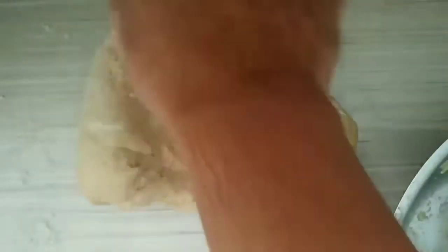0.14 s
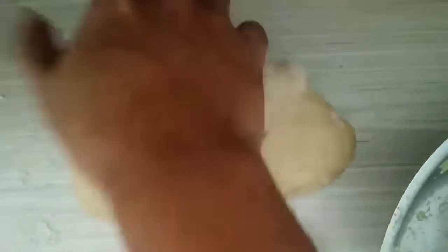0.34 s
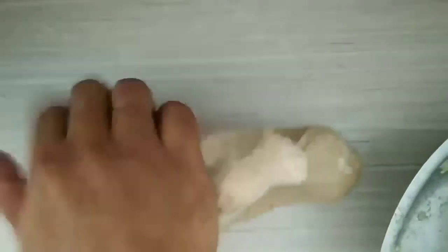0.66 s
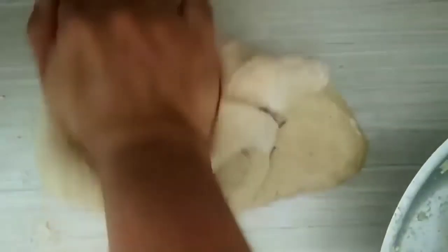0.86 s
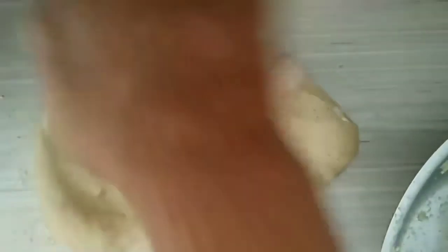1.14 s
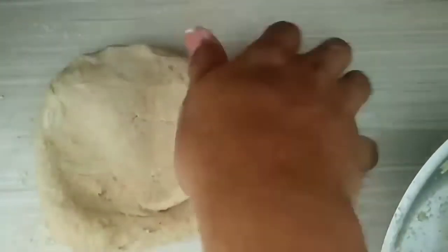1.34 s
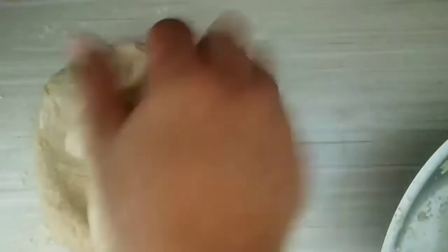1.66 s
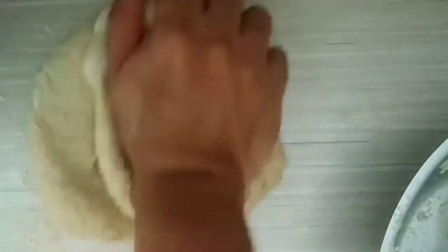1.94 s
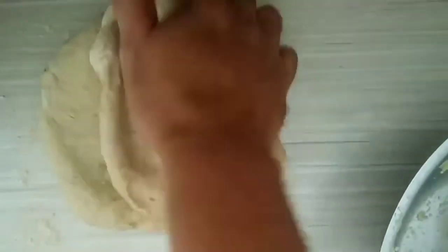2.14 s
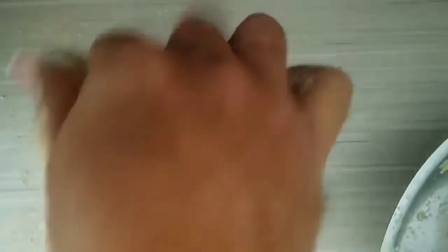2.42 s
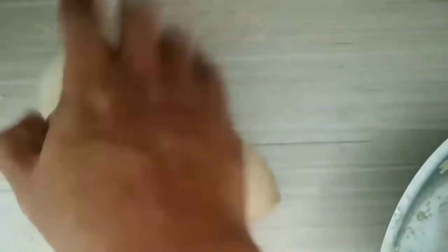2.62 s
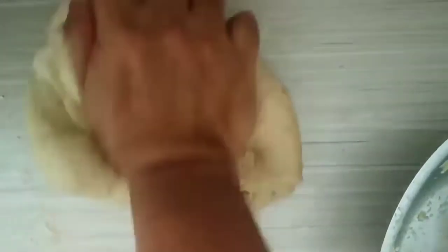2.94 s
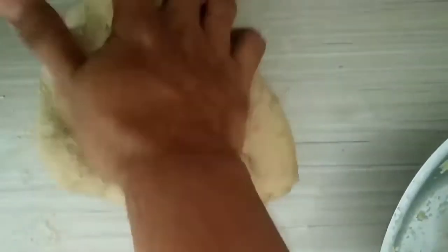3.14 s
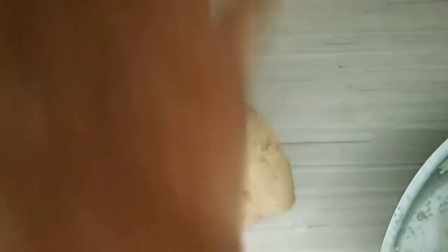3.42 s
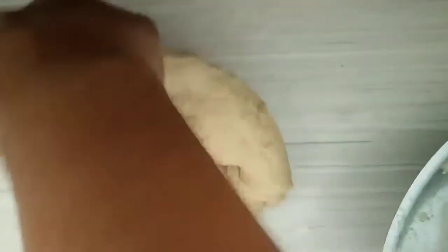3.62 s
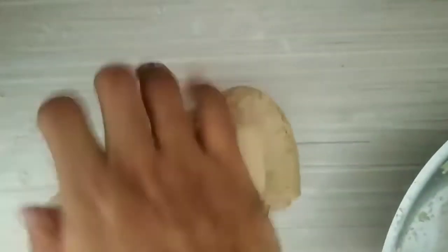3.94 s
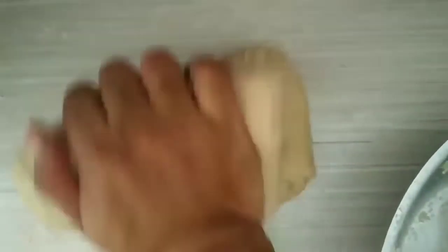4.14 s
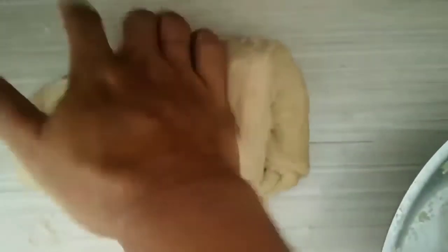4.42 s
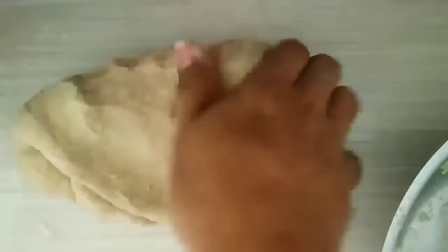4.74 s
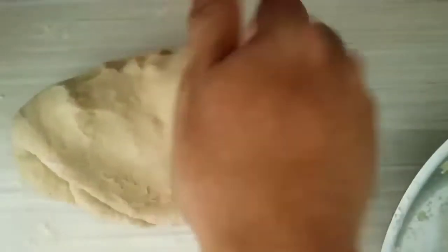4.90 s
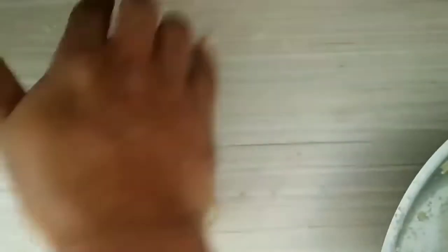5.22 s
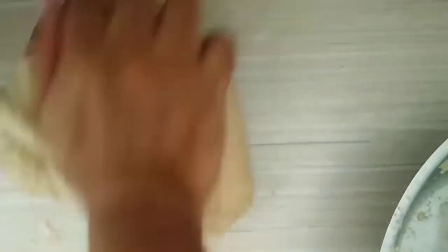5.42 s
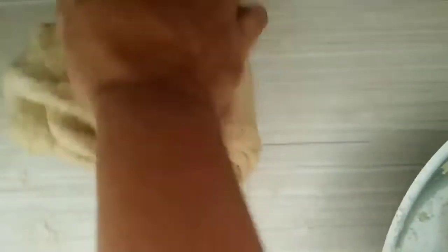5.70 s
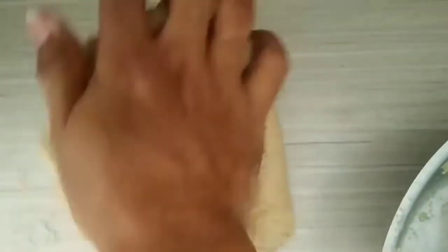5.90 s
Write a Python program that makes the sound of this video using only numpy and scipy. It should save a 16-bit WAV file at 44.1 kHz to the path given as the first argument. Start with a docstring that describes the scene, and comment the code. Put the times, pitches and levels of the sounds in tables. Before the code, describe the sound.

A hand kneads soft dough on a floured board, with low thuds, dry floury swishes, sticky squelches and soft pats over room hiss.

```python
"""A hand kneads soft dough on a floured board, close to the microphone, over steady room hiss and hum.
0-0.7 s: air sputters, the dough flops down (ringing board modes, hollow pops), a pat, fingers sweep flour.
0.8-3 s: pushes with crisp swishes (shaped noise), squelches and judders (stick-slip), a flop at 1.2 s.
3-4.6 s: four more flops, settling in softer bumps, with pops, pats and pushes among them.
4.7-6 s: a strong sweep (patchy noise), a last bright push at 5.5 s, pats and a final sweep."""
import sys
import numpy as np
from scipy import signal
from scipy.fft import rfft, irfft, next_fast_len
from scipy.io import wavfile

SR = 44100
rng = np.random.default_rng(int(sys.argv[2]) if len(sys.argv) > 2 else 0)


def dump(signal):
    """Clip the signal to [-1, 1] and save it as 16-bit WAV at the path in sys.argv[1]."""
    limited = np.clip(np.atleast_2d(signal).T, -1, 1)
    pcm = np.round(limited * 32767).astype(np.int16)
    wavfile.write(sys.argv[1], SR, pcm)


N = 267246
TIME_S = np.arange(N) / SR

# Levels are those of the dry source, ahead of its filters, echo, bowl and capsules.

# board modes damped by dough; each blow sets the first row's f: f/Hz, level/dB, t60/s
BOARD_MODES = [(177.8, 24, 0.062), (316.4, 1.5, 0.054), (632, -21, 0.2), (760, 5, 0.012),
               (910, -11.5, 0.094)]
# dough flopped down: t/s, peak level/dB, contact/ms, lowest-mode gain/dB (weak = off centre),
# lowest-mode f under load/Hz, settling time/s, settling bump below blow/dB
FLOPS = [(0.0786, -5.5, 0.74, -19.5, 183, .027, 13.5), (1.1599, -11.5, 1.05, 4, 175, 0.036, 19),
         (3.075, -21, 1.06, -6, 176, .026, 1), (3.4386, -12.5, 1.03, 0, 160, 0.029, 12),
         (4.193, -17.5, 2.2, 2, 179, 0.036, 14), (4.5743, -16, 3.1, 9, 168, 0.067, 6)]
# hand pats dough: t/s, peak level/dB, contact/ms, lowest-mode gain/dB, lowest-mode f under load/Hz
PATS = [(0.153, -24.5, 1.5, 4, 178), (0.5251, -31.5, 2.2, 5, 180), (0.956, -35, 1.1, 27, 189),
        (1.0008, -20.5, 1.2, 2, 194), (2.133, -31, 0.84, 2, 169), (2.78, -31, 5.1, -8, 157),
        (2.9226, -28.5, 0.64, -8, 177), (3.027, -31, 3.4, 0, 193), (3.414, -9, 1.7, 9, 178.3),
        (3.518, -28, 3.6, 4, 168), (3.9206, -31.5, 5.3, 9, 165), (4.0788, -29, 0.9, -6, 190),
        (4.609, -34, 2.5, 6, 165), (4.762, -35, 2.1, -6, 185), (5.314, -27, 1.5, -20, 184),
        (5.331, -31, 1.5, -15, 180), (5.3835, -29.5, 2, 2, 200), (5.586, -26, 1.4, 3, 182),
        (5.7475, -20, 1.1, -6.5, 172)]
# second settling bump: longer gap, weaker the later it comes
SETTLE_GAP_RATIO, SETTLE_FADE_DB_PER_S = 1.45, 153
SETTLE_CONTACT_MS, SETTLE_LOWEST_DB = 2.96, 17

# dough judders over the board: start t/s, length/s, rms level at crest/dB, slip rate/Hz
JUDDERS = [(.828, 0.053, -31, 200), (1.9, 0.15, -35, 190), (2.955, 0.13, -43, 180),
           (4.22, 0.042, -34.5, 183), (5.485, 0.13, -41.5, 185)]
JUDDER_JITTER_RATIO, JUDDER_ROUGH_DB, JUDDER_CHANGES_PER_S = 0.073, 2.5, 31

# palm flicks over floury dough: t/s, rms level at crest/dB, rise/ms, left-right/dB, gap resonance f/Hz
SWISHES = [(0.069, -38, 11.6, 1, 6940), (0.083, -39.5, 16, 0, 8000), (0.1547, -34.5, 4.3, 1, 7360),
           (0.8128, -27, 4.4, 1, 5900), (0.813, -44, 2.7, 0, 1500), (1.157, -44.5, 2.8, 4, 1600),
           (1.9456, -25.5, 2.3, 3, 5150), (2.9307, -25.5, 3.4, 1, 5200), (3.4118, -34, 5, -4.5, 1400),
           (3.419, -32.5, 5, -3, 2300), (3.4373, -46, 2.6, -3, 1300), (3.4717, -37, 5.2, -3.5, 2480),
           (4.198, -30.5, 3.3, 2, 6200), (4.633, -34.5, 5, -3, 4170), (5.4721, -26, 3.3, 2.5, 8050),
           (5.475, -41, 4.3, 3, 2200), (5.869, -33.5, 2.7, -4, 8000)]
# swish hiss spectrum: f/Hz, relative level/dB per Hz
SWISH_SPECTRUM = [(300, -4), (1000, 5.5), (3500, 3), (6500, 9.5), (9000, 14), (12500, 9), (15000, 4)]
GAP_DB, GAP_WIDTH_HZ = -7, 870

# air squeezed from under hand or dough: t/s, peak level/dB, f/Hz, t60/s
POPS = [(0.08, -14.5, 337, 0.036), (.0825, -27, 695, 0.047), (.170, -28.5, 600, 0.025),
        (.836, -35, 694, 0.047), (.887, -39, 1310, 0.011), (.9985, -37, 730, 0.035),
        (1.1615, -14.5, 349, 0.026), (1.1625, -23, 703, .012), (1.171, -28.5, 620, 0.012),
        (2.013, -26.5, 800, 0.0099), (2.018, -30, 2340, 0.0073), (2.037, -30, 710, .014),
        (2.991, -24.5, 2300, 0.012), (2.992, -34, 1290, 0.0073), (3.017, -34, 775, .018),
        (3.0738, -25.5, 840, 0.012), (3.426, -28.5, 750, 0.028), (3.4315, -13.5, 266, 0.035),
        (3.4395, -25.5, 666, 0.0056), (3.915, -36.5, 1020, 0.012), (4.221, -29, 760, 0.0078),
        (4.242, -46, 1680, 0.006), (4.575, -16, 330, 0.022), (4.698, -37, 807, 0.013),
        (4.743, -38, 830, 0.012), (4.782, -30.5, 1830, 0.0082), (5.331, -27.5, 910, 0.011),
        (5.58, -37, 800, 0.016), (5.746, -27, 805, 0.0034)]
# run of growing pops ahead of the first flop
SPUTTER_START_S, SPUTTER_GAP_S, SPUTTER_DB = .0395, .0083, -26
SPUTTER_GROWTH_DB, SPUTTER_HZ, SPUTTER_T60_S = 1.7, 577, 0.0076
# pops come from the right, late on the left
POP_LAG_MS, POP_PAN_DB = 0.27, -0.5

# heel of hand pushes: full-grip t/s, grip time/s, length/s, brushing level/dB,
# dragging level/dB (before DRAG_LIFT_DB), crackle level/dB
PUSHES = [(0.049, 0.014, 0.033, -53.5, -39.5, -52), (0.149, .018, 0.041, -46, -44, -51),
          (0.827, 0.043, 0.063, -40.5, -41.5, -50), (1.26, 0.16, 0.16, -49.5, -47.5, -58),
          (1.946, 0.05, 0.065, -46, -43.5, -53), (2.011, 0.026, 0.024, -37, -43, -40),
          (2.068, 0.022, 0.35, -46, -50.5, -64), (2.988, 0.083, 0.06, -44.5, -43, -46.5),
          (3.137, 0.03, 0.02, -48.5, -49, -67), (3.416, 0.0061, 0.058, -72, -40.5, -48),
          (4.205, 0.032, 0.081, -40, -42.5, -48), (4.629, 0.016, 0.009, -44.5, -45.5, -47.5),
          (5.482, 0.015, 0.047, -44, -43, -62), (5.575, 0.023, 0.0086, -45.5, -43, -49)]
# a push slows as the dough resists, then lets go
SAG_DB_PER_S, LET_GO_S = 27, 0.033
# fingers gather dough: greatest-speed t/s, swell time/s, brushing level/dB,
# dragging level/dB (before DRAG_LIFT_DB)
SWEEPS = [(.01, .05, -47.5, -49), (.275, 0.072, -53.5, -51.5), (.66, 0.13, -49, -50.5),
          (.735, 0.13, -48, -50), (.985, 0.036, -60, -52.5), (1.515, 0.059, -58, -54),
          (1.817, 0.24, -47, -52.5), (2.809, 0.11, -46, -49.5), (4.09, 0.43, -61, -56),
          (4.778, 0.084, -41.5, -44.5), (5.322, 0.052, -45, -45), (5.82, 0.11, -50, -63),
          (6.04, 0.14, -51, -54.5)]
SWEEP_STOP_S = 0.06
# the hand never quite leaves the dough
TOUCH_BRUSH_DB, TOUCH_DRAG_DB, TOUCH_WANDER_DB = -57, -64, 3.5
# floured dough hardly sticks: crackle of sweep and touch relative to unlifted dragging
SWEEP_TACK_DB = -7.5
DRAG_LIFT_DB = 6.0
# brushing spectrum: f/Hz, relative level/dB per Hz
BRUSH_SPECTRUM = [(1000, -60), (2500, 2), (4200, 0.5), (7000, 2), (9000, 3.5), (12000, -0.5), (15000, 1.5),
                  (16000, -56)]
# dragging spectrum: f/Hz, relative level/dB per Hz
DRAG_SPECTRUM = [(60, -50), (100, -45), (140, 22.5), (190, 26), (300, 19.5), (460, 8.5), (600, 7),
                 (790, 13.5), (1100, 0.5), (1900, 3), (3000, -4), (5000, -6), (10000, -44)]
SNAPS_PER_S, SNAP_SPREAD_DB, SNAP_CYCLES = 2200, 3.0, 16

# fold opens or closes: t/s, length/s, rms level/dB (then swelled to a crest), start f/Hz, end f/Hz
SQUELCHES = [(0.034, .05, -49, 2030, 1790), (0.851, 0.068, -41.5, 705, 850), (1.31, 0.13, -54.5, 980, 1050),
             (1.909, 0.044, -48, 2050, 1340), (2.966, 0.079, -45, 3130, 1100),
             (3.118, 0.037, -55, 1990, 2040), (4.235, 0.058, -61, 2280, 1220),
             (4.723, 0.045, -50.5, 2000, 1690), (5.485, 0.075, -50.5, 2300, 1350),
             (5.558, 0.034, -47, 1200, 1800)]
SLIPS_PER_S, SLIP_SPREAD_RATIO, FOLD_WIDTH_HZ = 700, 0.64, 270

# bowl resonances: f/Hz, level relative to driving sound/dB, width/Hz
BOWL_MODES = [(529, -5.5, 14), (625.5, -2, 6.1), (1273, -5.5, 24), (1860, -2.5, 15), (2423, -6.5, 13),
              (2670, -26, 12), (3980, -5, 23), (6570, -5.5, 60), (7500, -9, 52)]
# room hiss and hum spectrum: f/Hz, relative level/dB per Hz
AMBIENCE_SPECTRUM = [(30, -49), (80, -41), (130, -10.5), (185, 4), (290, -6.5), (520, -11), (1000, -23),
                     (2000, -21.5), (3200, -26.5), (4300, -28.5), (8700, -29.5), (12500, -31),
                     (15500, -34.5)]
AMBIENCE_DB = -48
# faint appliance whine: f/Hz, rms level/dB
WHINE = [(2050, -69.5), (2440, -73.5), (3221, -73.5), (4978, -77), (8769, -79), (13566, -80)]
# left-right likeness of noise: f/Hz, correlation/1
LIKENESS = [(60, 0.11), (140, 1), (290, 0.63), (640, 0.62), (1400, 0), (3000, 0), (15000, 0)]
# room echo spectrum: f/Hz, relative level/dB per Hz
ECHO_SPECTRUM = [(90, -27), (135, -1), (180, -6.5), (300, -3), (450, 4.5), (630, 4), (850, -1),
                 (1300, 11.5), (4000, -5), (15000, -10.5)]
KITCHEN_T60_S = 0.56
# capsule colour: f/Hz, left-right/dB
BALANCE = [(150, -0.3), (330, 0.5), (750, -1), (1200, 1), (2700, 0.5), (4200, 1), (6400, -4), (9800, -1),
           (14000, 4)]
CUTOFF_HZ = 16000


def thuds():
    """Weight of dough and hand rings the board briefly; each flop settles in two further bumps."""
    blows = list(PATS)
    for s, db, contact_ms, lowest_db, hz, settle_s, softer_db in FLOPS:
        gap_s = settle_s * SETTLE_GAP_RATIO
        bump_s, bump_db = s + settle_s, db - softer_db
        last_db = bump_db - SETTLE_FADE_DB_PER_S * gap_s
        blows.append((s, db, contact_ms, lowest_db, hz))
        blows.append((bump_s, bump_db, SETTLE_CONTACT_MS, SETTLE_LOWEST_DB, hz))
        blows.append((bump_s + gap_s, last_db, SETTLE_CONTACT_MS, SETTLE_LOWEST_DB, hz))
    out = np.zeros((2, N))
    for s, db, contact_ms, lowest_db, hz in blows:
        add(out, s, from_db(db) * strike(contact_ms, lowest_db, hz, low_cut_hz=86.8, low_cut_db=42))
    return out


def strike(contact_ms, lowest_db, lowest_hz, low_cut_hz, low_cut_db, size=8192):
    """Push on the board, peak 1: longer contact weakens higher modes, load retunes the lowest."""
    contact = TIME_S[:size] / (contact_ms / 1000)
    push = (contact * np.exp(-contact * 2)) ** 2
    out = np.zeros(size)
    for k, (hz, db, t60_s) in enumerate(BOARD_MODES):
        if k == 0:
            hz, db = lowest_hz, db + lowest_db
        # neighbouring modes swing against each other, so the thud builds up roundly
        gain = (-1) ** k * from_db(db)
        r, w = from_db(-60 / (t60_s * SR)), 2 * np.pi * hz / SR
        out += gain * signal.lfilter([0, np.sin(w)], [1, -2 * r * np.cos(w), r * r], push)
    # a small surface radiates hardly any deep bass
    low_cut = signal.cheby2(4, low_cut_db, low_cut_hz, "high", fs=SR, output="sos")
    out = signal.sosfilt(low_cut, out)
    return out / np.abs(out).max()


def judders():
    """Dragged dough sticks and slips near the lowest mode's pitch: a short unsteady purr."""
    out = np.zeros((2, N))
    for s, length_s, db, hz in JUDDERS:
        progress = np.linspace(0, 1, int(length_s * SR))
        pace, grip = flutter(JUDDER_CHANGES_PER_S)[:2 * len(progress)].reshape(2, -1)
        slip_hz = hz * (1 + JUDDER_JITTER_RATIO * pace)
        swing = np.sqrt(2) * np.sin(2 * np.pi * np.cumsum(slip_hz) / SR)
        level = from_db(db + JUDDER_ROUGH_DB * grip) * np.sin(np.pi * progress)
        add(out, s, level * swing)
    return high_pass(out, 110)


def swishes(size=4096):
    """Flour friction swells and dies within milliseconds, coloured by the gap under the palm."""
    out = np.zeros((2, N))
    for s, db, rise_ms, pan_db, hz in SWISHES:
        age = TIME_S[:size] * 1000 / rise_ms
        swell = age * np.exp((1 - age ** 2) / 2)  # crest 1 at age 1
        gap = cavity(rng.standard_normal((2, size)), hz, GAP_WIDTH_HZ)
        hiss = rms_one(stereo_noise(SWISH_SPECTRUM, size=size) + from_db(GAP_DB) * gap)
        add(out, s, from_db(db) * pan(pan_db) * swell * hiss)
    return out


def pops(size=4096, count=5):
    """Air pockets open within about a cycle and ring a few more; smaller pockets are higher."""
    out, t = np.zeros((2, N)), TIME_S[:size]
    sputter = [(SPUTTER_START_S + k * SPUTTER_GAP_S, SPUTTER_DB + k * SPUTTER_GROWTH_DB,
                SPUTTER_HZ, SPUTTER_T60_S) for k in range(count)]
    for s, db, hz, t60_s in POPS + sputter:
        opening = 1 - np.exp(-2 * hz * t)
        pop = np.sin(2 * np.pi * hz * t) * opening * from_db(-60 * t / t60_s)
        add(out, s, from_db(db) * pop / np.abs(pop).max())
    # so small a source radiates no deep bass
    return high_pass(out, 170)


def rubbing():
    """Skin brushes flour with a fine hiss; pressed dough drags unevenly, crackles and squelches."""
    brushing, dragging, sticking = friction()
    brush_level = brushing * from_db(1.3 * flutter(45)) * from_db([[-1.0], [.8]])
    drag_level = dragging * from_db(DRAG_LIFT_DB + 1.15 * flutter(49))
    tack_level = sticking * from_db(2.9 * flutter(45))
    brush = brush_level * patchy_noise(BRUSH_SPECTRUM, patchy_db=2.0, per_s=14.6)
    drag = drag_level * patchy_noise(DRAG_SPECTRUM, patchy_db=3.5, per_s=26.0)
    tack = tack_level * crackle(SNAPS_PER_S, SNAP_SPREAD_DB, SNAP_CYCLES)
    return brush + drag + tack + squelches()


def friction():
    """Brushing, dragging and sticking levels: pushes, sweeps and resting touch add in power."""
    touch_db = [[TOUCH_BRUSH_DB], [TOUCH_DRAG_DB], [TOUCH_DRAG_DB + SWEEP_TACK_DB]]
    power = from_db(touch_db + TOUCH_WANDER_DB * flutter(2)) ** 2
    for s, grip_s, length_s, brush_db, drag_db, tack_db in PUSHES:
        age_s = TIME_S - s
        grip = np.exp(-np.clip(-age_s / grip_s, 0, 10) ** 2 * 2)
        sag = from_db(-SAG_DB_PER_S * np.clip(age_s, 0, length_s))
        let_go = np.exp(-np.clip(age_s - length_s, 0, 1) / LET_GO_S)
        power += (from_db([[brush_db], [drag_db], [tack_db]]) * grip * sag * let_go) ** 2
    for s, swell_s, brush_db, drag_db in SWEEPS:
        age_s = np.clip(TIME_S - s, -1, 1)
        sweep = 1 / np.cosh(2 * age_s / np.where(age_s < 0, swell_s, SWEEP_STOP_S))
        power += (from_db([[brush_db], [drag_db], [drag_db + SWEEP_TACK_DB]]) * sweep) ** 2
    return np.sqrt(power)


def patchy_noise(spectrum, patchy_db, per_s, count=9):
    """Noise whose bands swell and fade separately as the contact shifts; rms 1."""
    edges_hz = np.concatenate([[1], np.geomspace(600, 12000, count - 1), [SR]])
    size = next_fast_len(N)
    whole = rfft(stereo_noise(spectrum), size)
    hz = np.fft.rfftfreq(size, 1 / SR)
    out = np.zeros((2, N))
    for low_hz, high_hz in zip(edges_hz, edges_hz[1:]):
        band = irfft(whole * ((hz >= low_hz) & (hz < high_hz)), size)[:, :N]
        out += band * from_db(patchy_db * flutter(per_s))
    return rms_one(out)


def crackle(per_s, size_db, cycles, count=18):
    """Tacky dough lets go in tiny snaps that ring at one of several pitches; rms 1."""
    out = np.zeros((2, N))
    for hz in np.geomspace(720, 3500, count):
        snaps = np.zeros((2, N))
        at = rng.integers(0, N, int(per_s * N / SR / count))
        spread_db = size_db * np.minimum(rng.exponential(1, len(at)), 3)
        snaps[:, at] = rng.standard_normal((2, len(at))) * from_db(spread_db)
        # 60 dB down after the given cycles
        r, w = from_db(-60 * hz / (cycles * SR)), 2 * np.pi * hz / SR
        ring = signal.lfilter([1 - r, 0, r - 1], [1, -2 * r * np.cos(w), r * r], snaps + 1e-18)
        out += ring / np.sqrt(hz)
    return rms_one(out)


def squelches():
    """Skin peels off dough in quick uneven slips that ring in a fold of changing size."""
    out = np.zeros((2, N))
    for s, length_s, db, start_hz, end_hz in SQUELCHES:
        progress = np.linspace(0, 1, int(length_s * SR))
        slipping = rng.random(len(progress)) < SLIPS_PER_S / SR
        strength = 1 + SLIP_SPREAD_RATIO * rng.standard_normal((2, len(progress)))
        fold_hz = start_hz * (end_hz / start_hz) ** progress
        fold = cavity(slipping * strength, fold_hz, FOLD_WIDTH_HZ)
        add(out, s, from_db(db) * np.sin(np.pi * progress) * fold)
    return high_pass(out, 500)


def bowl(x):
    """Narrow resonances of the bowl beside the board, driven by the sound around it."""
    out = np.zeros_like(x)
    for hz, db, width_hz in BOWL_MODES:
        b, a = signal.iirpeak(hz, hz / width_hz, fs=SR)
        out += from_db(db) * signal.lfilter(b, a, x)
    return out


def kitchen(x, wet_db, first_s, size=24000):
    """Wall echoes build up after a short gap and die away."""
    t = TIME_S[:size]
    build_up = np.clip(t / first_s - 1, 0, 1)
    tail = stereo_noise(ECHO_SPECTRUM, size=size) * from_db(-60 * t / KITCHEN_T60_S) * build_up
    tail = tail / np.sqrt(np.sum(tail ** 2) / 2)
    return x + from_db(wet_db) * signal.fftconvolve(x, tail, axes=1)[:, :N]


def ambience():
    """Steady noise for the room's hum and hiss, steady sines for the thin whine."""
    out = from_db(AMBIENCE_DB) * stereo_noise(AMBIENCE_SPECTRUM)
    for hz, db in WHINE:
        out += from_db(db) * np.sqrt(2) * np.sin(2 * np.pi * (hz * TIME_S + rng.random()))
    return out


def cavity(x, hz, width_hz):
    """One resonance, pitch free to move per sample; rms 1."""
    turn = np.exp(2j * np.pi * np.cumsum(hz * np.ones(x.shape[-1])) / SR)
    # shift the pitch to 0 Hz, smooth, shift back
    smooth = signal.lfilter([1], [1, -np.exp(-np.pi * width_hz / SR)], x / turn)
    return rms_one((smooth * turn).real)


def stereo_noise(spectrum, size=N):
    """Coloured noise, left-right correlation by frequency from LIKENESS; rms 1."""
    fft_size = next_fast_len(size)
    hz = np.maximum(np.fft.rfftfreq(fft_size, 1 / SR), 1)
    mid, side = rfft(rng.standard_normal((2, fft_size)))
    alike = np.clip(at_hz(LIKENESS, hz), -1, 1)
    both = np.sqrt(1 + alike) * mid + np.sqrt(1 - alike) * side * [[1], [-1]]
    return rms_one(irfft(both * from_db(at_hz(spectrum, hz)), fft_size)[:, :size])


def flutter(per_s):
    """Smooth random wobble, rms 1."""
    r = np.exp(-2 * np.pi * per_s / SR)
    wobble = signal.lfilter([1], [1, -2 * r, r * r], rng.standard_normal(N + SR))
    return rms_one(wobble[SR:])  # drop the filter's run-in


def high_pass(x, hz):
    """Second-order low cut."""
    return signal.sosfilt(signal.butter(2, hz, "high", fs=SR, output="sos"), x)


def pan(left_right_db):
    """Left and right gains for a level difference."""
    return from_db(np.array([[left_right_db], [-left_right_db]]) / 2)


def off_centre(x, lag_ms, pan_db):
    """Delay the left side and tip the balance."""
    left = np.interp(TIME_S - lag_ms / 1000, TIME_S, x[0])
    return np.array([left, x[1]]) * pan(pan_db)


def from_db(db):
    """Decibels to gain."""
    return 10 ** (np.asarray(db) / 20)


def rms_one(x):
    """Scale to unit power."""
    return x / np.sqrt(np.mean(x ** 2) + 1e-20)


def at_hz(points, hz):
    """Read a spectrum on a log-frequency axis."""
    f, value = np.transpose(points)
    return np.interp(np.log(hz), np.log(f), value)


def add(track, s, sound):
    """Mix a sound into the track at time s."""
    start = max(round(s * SR), 0)
    part = sound[..., :N - start]
    track[..., start:start + part.shape[-1]] += part


def scene():
    """Hand, dough, board and bowl in the room."""
    blows = kitchen(thuds() + judders(), wet_db=-8.5, first_s=0.0009)
    flicks = kitchen(swishes(), wet_db=-13.0, first_s=0.0042)
    air = kitchen(off_centre(pops(), POP_LAG_MS, POP_PAN_DB), wet_db=-13.5, first_s=0.00031)
    sound = blows + flicks + air + rubbing() + ambience()
    return (sound + bowl(sound)) * from_db([[-.4], [.4]])


def record(dry):
    """Two capsules differ a little in colour; the top is cut steeply."""
    size = next_fast_len(N + 4096)
    tilt_db = at_hz(BALANCE, np.maximum(np.fft.rfftfreq(size, 1 / SR), 1))
    colour = from_db(np.array([tilt_db, -tilt_db]) / 2)
    heard = irfft(rfft(dry, size) * colour, size)[:, :N]
    return signal.sosfilt(signal.ellip(10, .2, 80, CUTOFF_HZ, fs=SR, output="sos"), heard)


dry = scene()
out = record(dry)
dump(out)
```